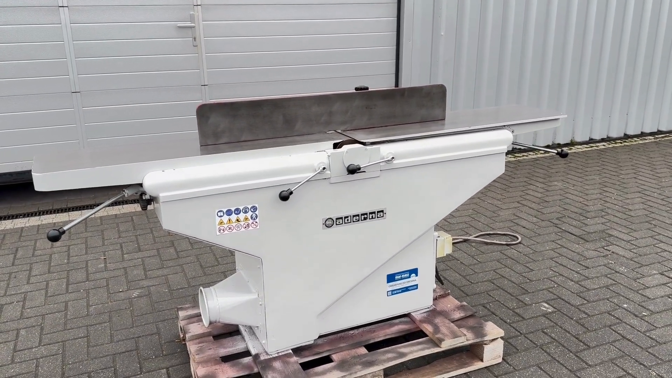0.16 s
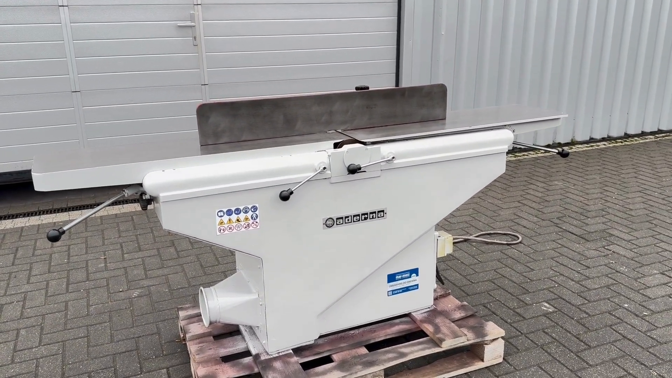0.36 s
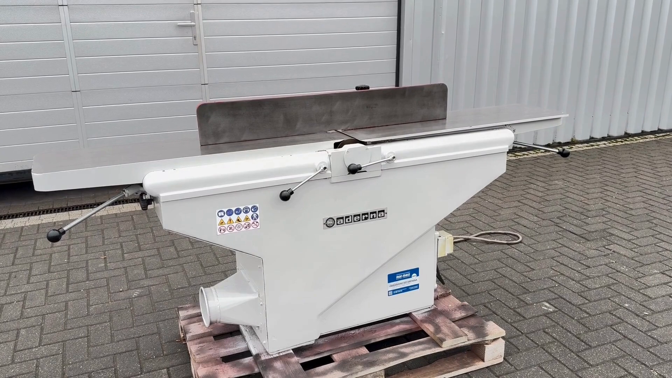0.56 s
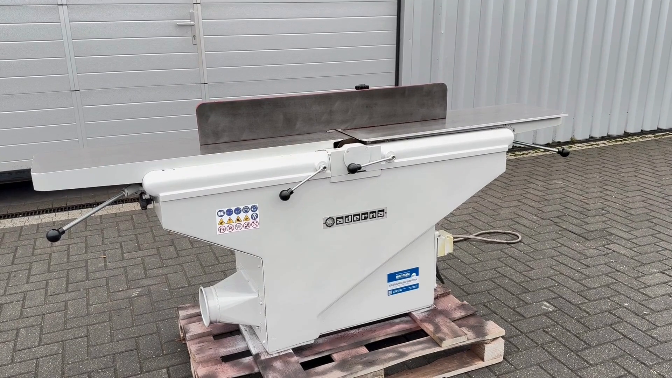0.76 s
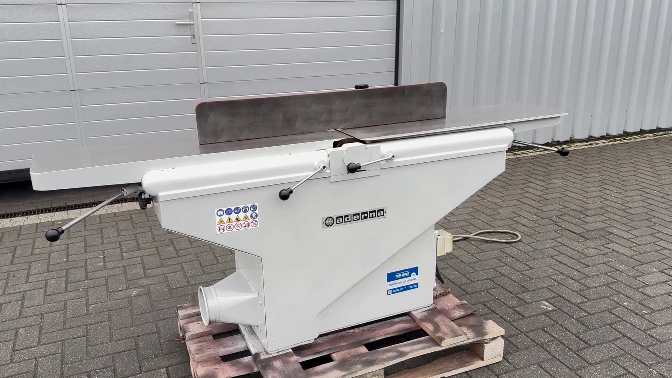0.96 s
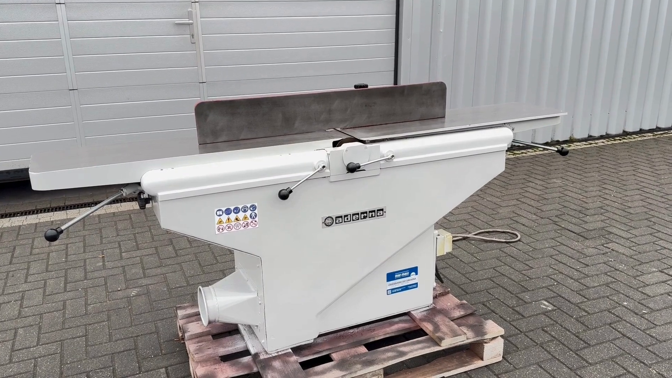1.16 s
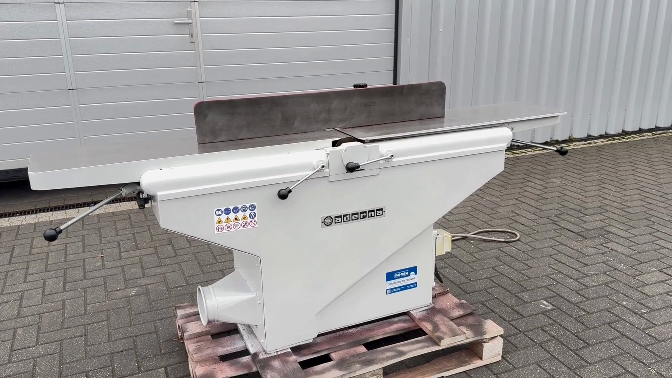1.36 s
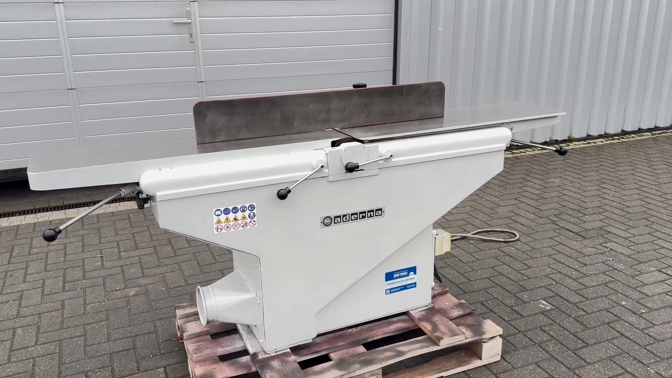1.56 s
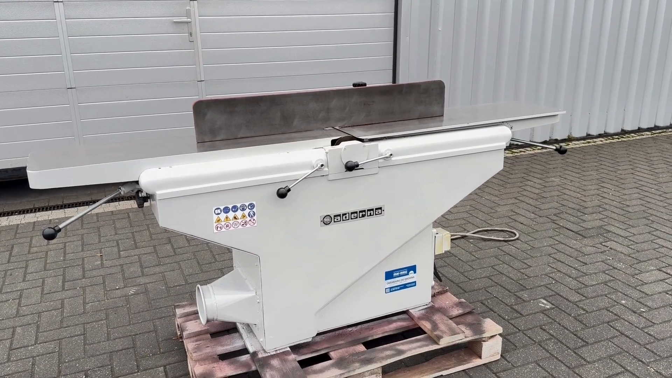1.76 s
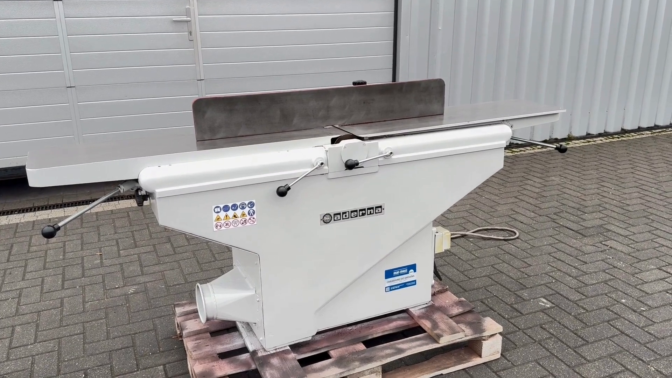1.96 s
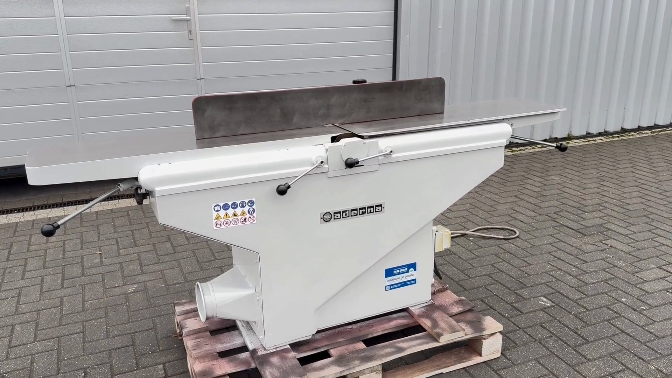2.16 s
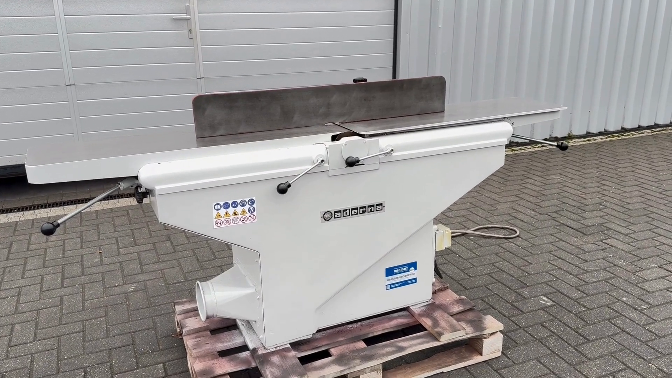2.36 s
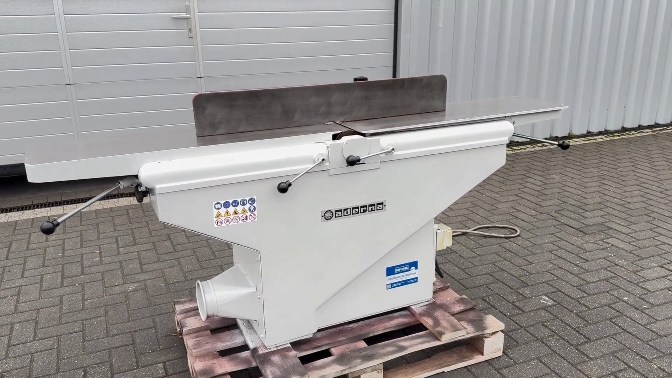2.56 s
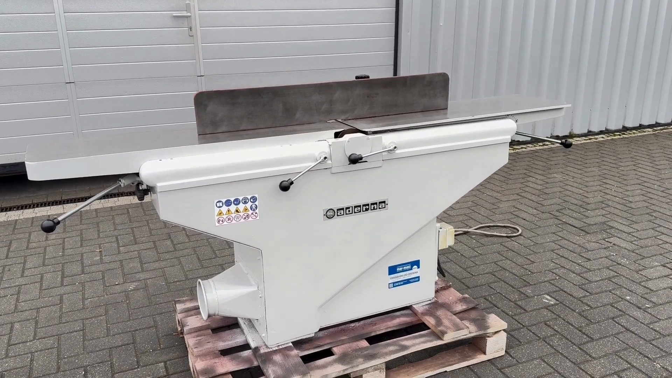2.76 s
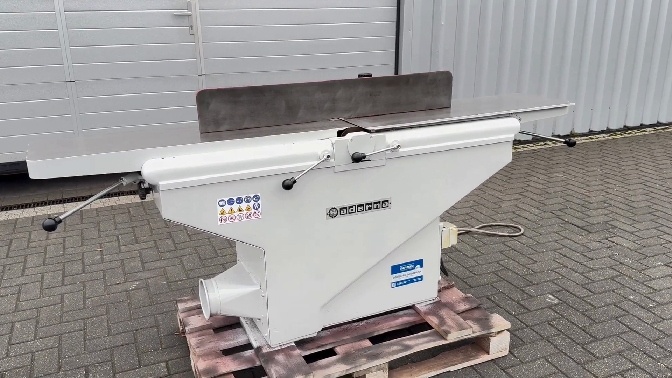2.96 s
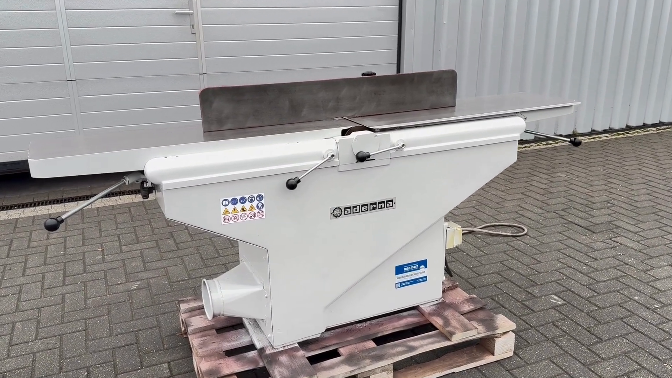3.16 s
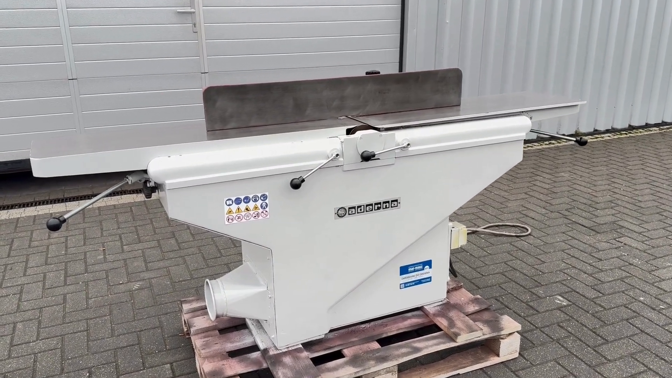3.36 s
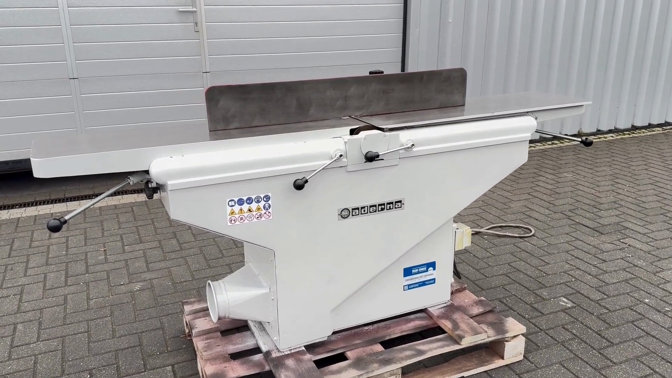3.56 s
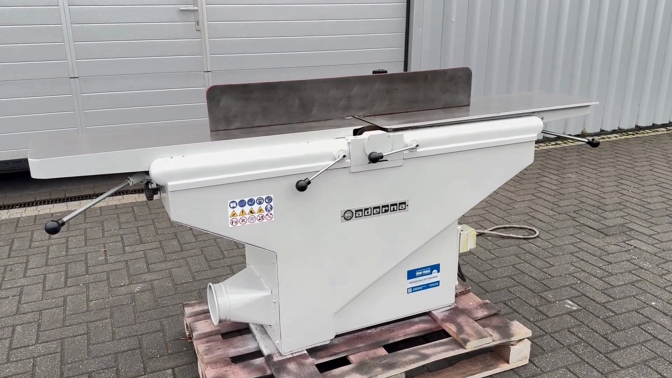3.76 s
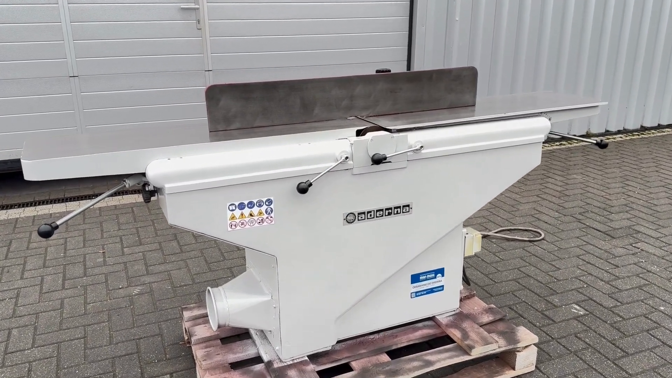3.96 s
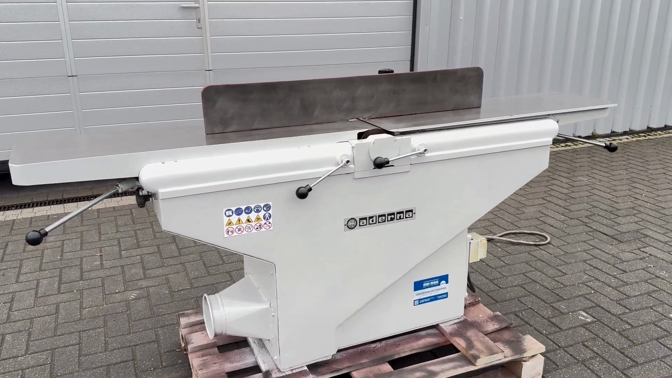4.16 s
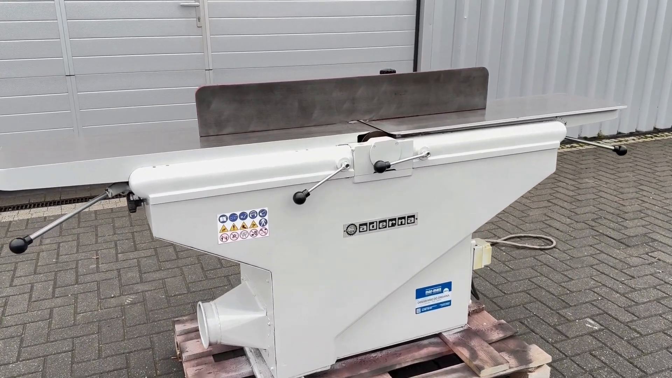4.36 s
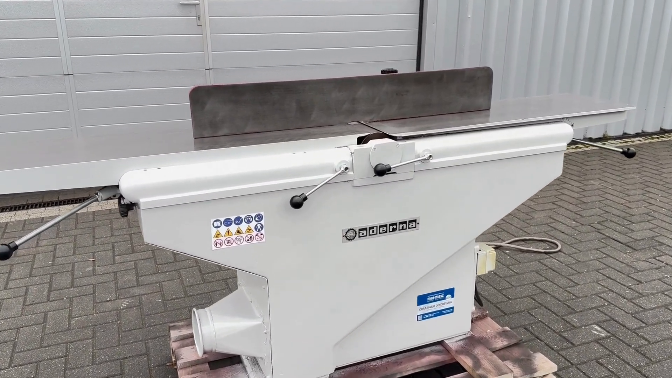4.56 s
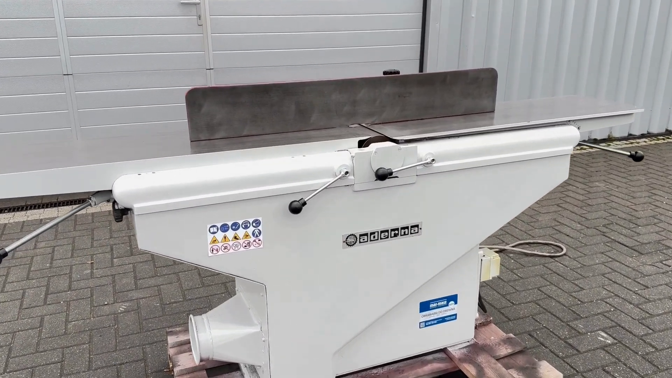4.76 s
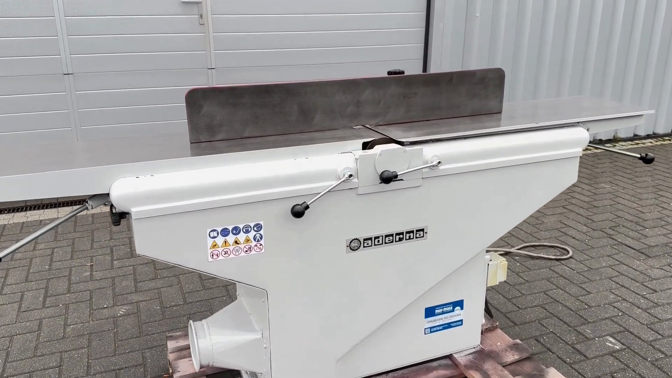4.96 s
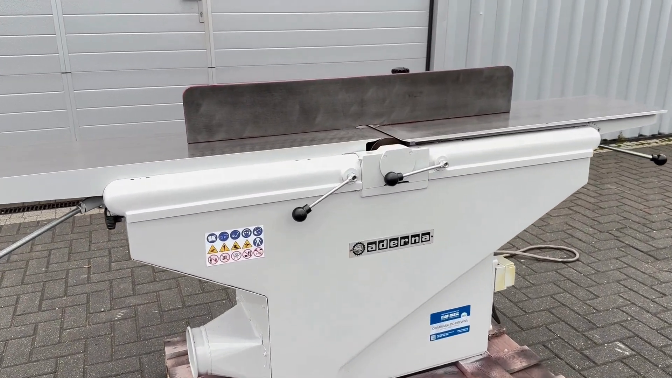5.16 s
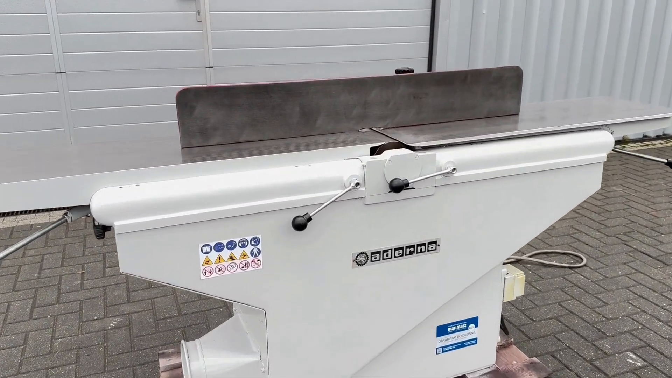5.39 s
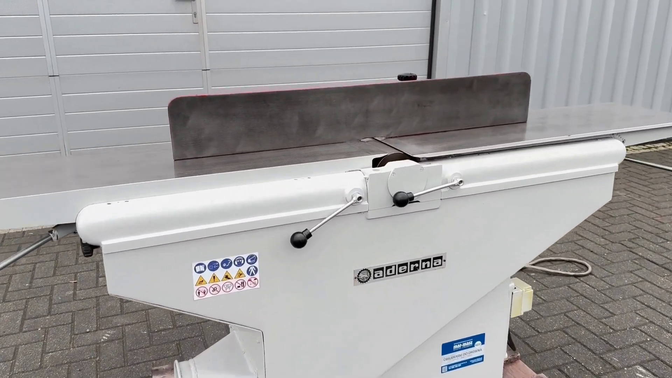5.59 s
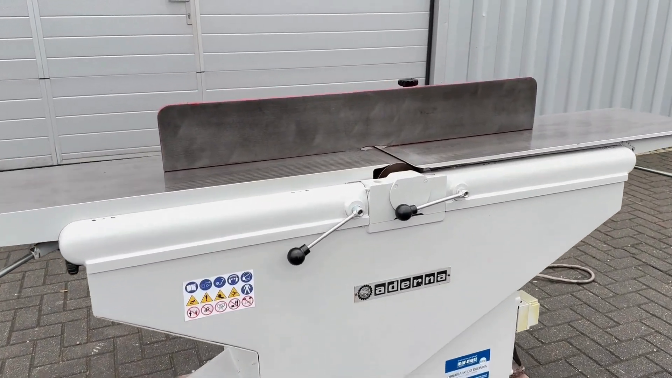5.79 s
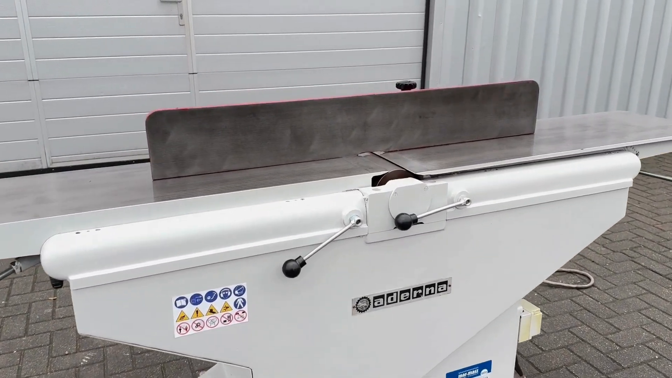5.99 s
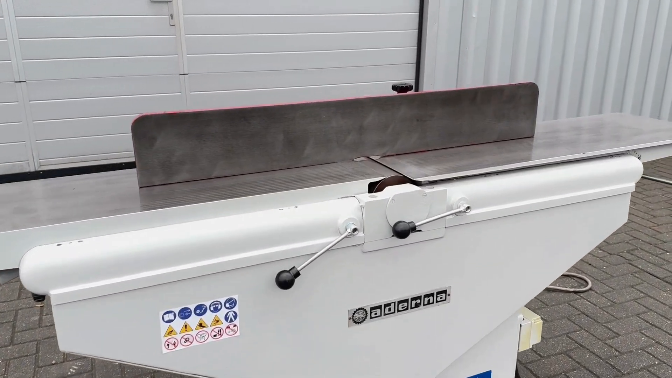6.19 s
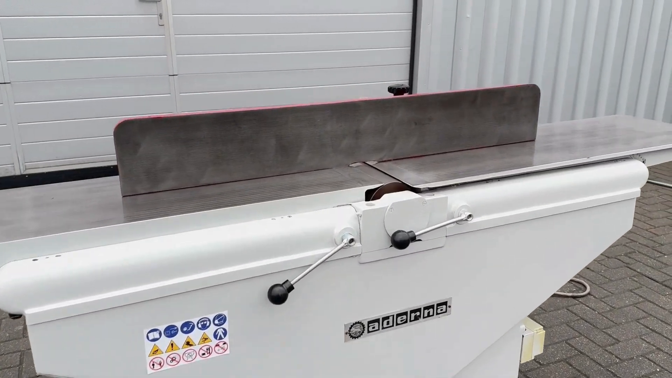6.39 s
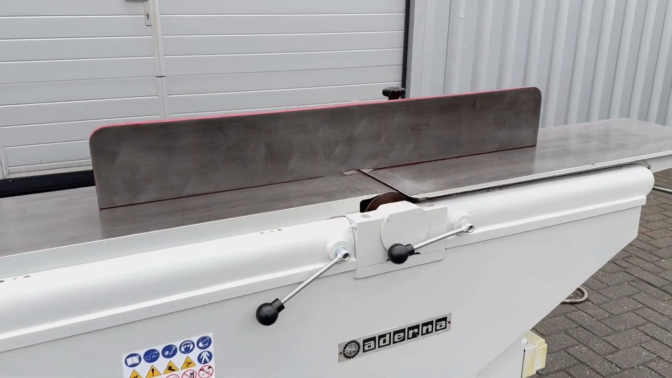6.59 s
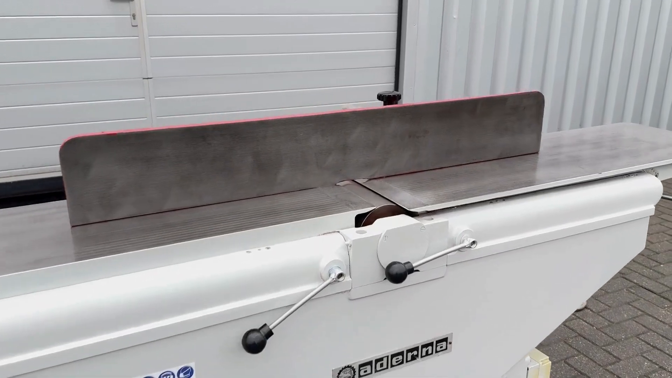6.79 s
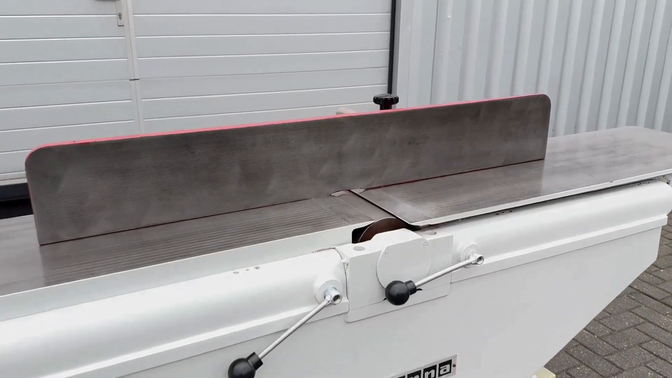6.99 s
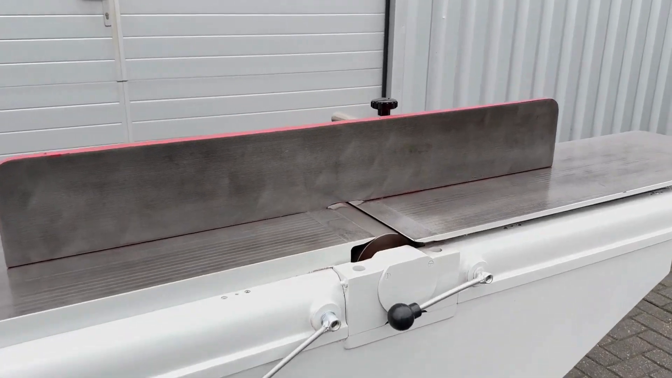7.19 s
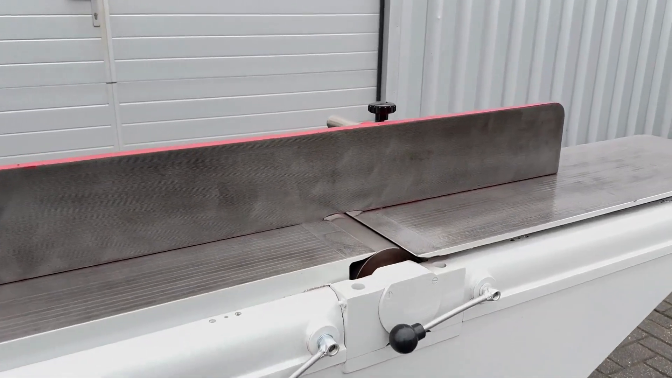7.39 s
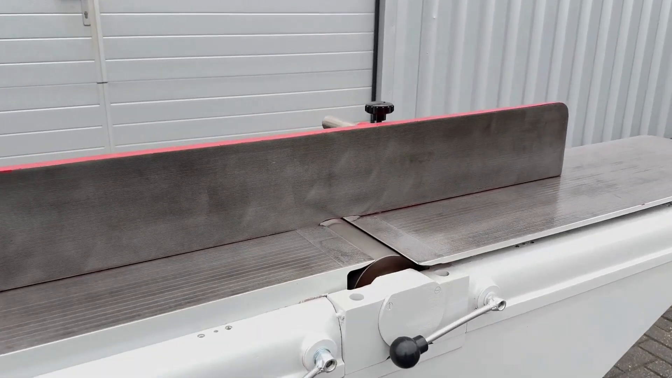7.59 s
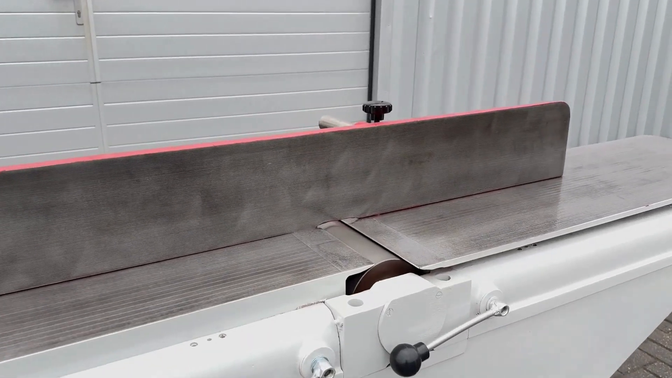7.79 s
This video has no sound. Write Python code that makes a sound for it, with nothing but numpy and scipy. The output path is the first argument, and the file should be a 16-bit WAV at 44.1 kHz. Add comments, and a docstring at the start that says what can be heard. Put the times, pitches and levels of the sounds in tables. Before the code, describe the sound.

A jointer planer is already running at full, constant speed in a paved yard, and it never starts, stops or cuts wood. Its three-knife block produces a siren-like steady tone near 240 Hz with strong harmonics up to about 1.7 kHz, over wavering motor and belt hum, rushing air and thin bright hiss. From 0 to 3 s the microphone stays back, the sound fairly even, with a tiny low wind bump around 0.4 s. From 3 to 6.5 s it walks closer: the fundamental and buzz swell clearly, while overtones fade, bloom and shift left or right through echoes from paving and wall. Faint high whistles recede. A very faint puff passes near 4.4 s. From 6.5 to 7.8 s the whine is close, full and loudest; soft wind bumps flutter from 7.4 s, the strongest low thump landing just before the end.

```python
"""Walking up to an idling jointer planer

A cast-iron jointer planer idles in a paved yard while the listener walks up to its table.
Three knives chop the air at the table lips like a siren: a stack of tones on one rotation phase.
Belt, motor and frame drone as wavering sines; the block drags air along as banded noise with echoes.
Siren tones swell and fade through loud and quiet spots before the wall; slot whistles recede.
Light wind puffs push the microphone as short low-frequency bursts."""
import sys
import numpy as np
from scipy import signal
from scipy.io import wavfile

SR = 44100
rng = np.random.default_rng(int(sys.argv[2]) if len(sys.argv) > 2 else 0)


def output_pcm(signal):
    """Save a mono or channel-first signal as 16-bit PCM at the path in sys.argv[1].

    Samples are clipped to [-1, 1] before scaling.
    """
    pcm = np.clip(np.atleast_2d(signal).T, -1, 1) * 32767
    wavfile.write(sys.argv[1], SR, np.round(pcm).astype(np.int16))


N = 345744


def from_db(db):
    """Decibels to amplitude gain."""
    return 10 ** (np.asarray(db) / 20)


def rms_one(x):
    """Scale to unit power."""
    return x / np.sqrt(np.mean(x ** 2) + 1e-20)


def seconds():
    """Time of each sample."""
    return np.arange(N) / SR


def in_time(rows):
    """Each column of a curve table, sample by sample."""
    time_s, *columns = np.transpose(rows)
    return [np.interp(seconds(), time_s, column) for column in columns]


def at_hz(points, hz):
    """Read a spectrum on a log-frequency axis."""
    table = np.array(points)
    return np.interp(np.log(hz), np.log(table[:, 0]), table[:, 1])


def any_phase():
    """Random starting angle in radians."""
    return rng.uniform(0, 2 * np.pi)


def bell(centre_s, sigma_s):
    """Gaussian rise to 1 at centre_s, and the fall after it."""
    return np.exp(-0.5 * ((seconds() - centre_s) / sigma_s) ** 2)


def drift(rate_hz):
    """Slow random curve of unit RMS: noise through two equal poles at rate_hz."""
    step = 40  # samples per slow point
    r = np.exp(-2 * np.pi * rate_hz * step / SR)
    settle = 2000
    white = rng.standard_normal(N // step + settle + 2)
    slow = signal.lfilter([1], [1, -2 * r, r * r], white)[settle:]
    return np.interp(np.arange(N) / step, np.arange(len(slow)), rms_one(slow))


def tone(phase, level_db, pan_db, lead_rad):
    """One sine at two ears: pan_db is left over right, lead_rad the left ear's phase lead."""
    lean = from_db(pan_db / 2)
    gain = np.sqrt(2) * from_db(level_db) * 2 / (lean + 1 / lean)
    left = lean * np.sin(phase + lead_rad / 2)
    right = np.sin(phase - lead_rad / 2) / lean
    return gain * np.array([left, right])


# wind puffs: (time [s], level [dB], Gaussian sigma [s])
WIND_PUFFS = [(.19, -44, .03), (0.378, -35, .02), (4.33, -43, .04), (4.44, -44, .03), (7.36, -40, .022),
              (7.426, -39, 0.02), (7.56, -39, .05), (7.69, -37, .025), (7.78, -24, .018)]
PUFF_HZ = 62.3


def wind(lumpiness_rad, upper_db):
    """Each puff shoves the microphone for a few uneven low cycles, with eddies an octave above."""
    swell = sum(from_db(db) * bell(time_s, sigma_s) for time_s, db, sigma_s in WIND_PUFFS)
    phase = 2 * np.pi * PUFF_HZ * seconds() + lumpiness_rad * drift(24)
    shove = tone(phase, 0, 1.5 * drift(8), 0.25 * drift(8))
    eddies = tone(2 * phase + drift(30), upper_db, 0, 0)
    return swell * (shove + eddies)


# motor and frame tones: (frequency [Hz], level afar [dB], level close up [dB])
DRIVE_TONES = [(49.5, -50.5, -47.5), (198, -51.5, -49), (215.5, -52.5, -52), (261.1, -61, -54),
               (275, -53.5, -48), (345.3, -50.5, -45), (364, -57, -56), (386.4, -42.5, -41.5),
               (492.5, -46, -36), (612, -46, -48.5), (648, -42, -50), (746, -62, -47), (785, -55, -46),
               (858, -52.5, -45), (1025, -56, -52)]


def drive(near, waver_db, slip_rad):
    """Motor and belt shake the frame; the flapping belt makes the tones waver."""
    out = 0
    for hz, far_db, near_db in DRIVE_TONES:
        level_db = far_db + near * (near_db - far_db) + waver_db * drift(0.8)
        phase = 2 * np.pi * hz * seconds() + any_phase() + slip_rad * drift(0.67)
        out = out + tone(phase, level_db, rng.normal(0, 1.4), rng.normal(0, 0.33))
    return out


# two low tones and a whine: (frequency [Hz], level afar [dB], level close up [dB])
BELT_TONES = [(115.5, -42.5, -38), (129.3, -39, -38.5), (843, -41, -36.5)]
# dips of one belt tone: (time [s], row of BELT_TONES [from 1], Gaussian sigma [s], loss [dB])
BELT_DIPS = [(.45, 1, .35, 13), (.45, 2, .25, 6), (3.438, 1, 0.3, 7), (3.5, 2, .2, 7), (4.35, 2, 0.11, 4),
             (4.45, 3, 0.48, 10.5), (4.7, 1, 0.2, 15), (5.85, 1, 0.16, 12), (6.0, 2, 0.15, 8),
             (6.95, 2, 0.18, 10), (7.45, 1, 0.19, 17)]


def belt(near, slip_rad, waver_db, flutter_s):
    """Two close low tones of the belt beat under a thin, fluttering whine; each fades at times."""
    out = 0
    for row, (hz, far_db, near_db) in enumerate(BELT_TONES, start=1):
        fade_db = sum(loss_db * bell(time_s, sigma_s)
                      for time_s, which, sigma_s, loss_db in BELT_DIPS if which == row)
        level_db = far_db + near * (near_db - far_db) - fade_db + waver_db * drift(1.4)
        fluttered_s = seconds() + flutter_s * drift(9.5)
        phase = 2 * np.pi * hz * fluttered_s + any_phase() + slip_rad * drift(2.5)
        out = out + tone(phase, level_db, 0.74 * drift(0.48), 0.11 * drift(0.7))
    return out


# air noise at the two ears: (frequency [Hz], left-right correlation [-1 to 1])
EAR_CORRELATION = [(50, 0.97), (300, 0.94), (800, 0.25), (1500, 1), (2500, 0.62), (4500, 0.3), (8000, 0.85),
                   (13000, 1)]


def noise_bands(low_hz, high_hz, count):
    """Adjacent stereo noise bands as (centre Hz, noise); the mid has unit power per kilohertz."""
    edges = np.geomspace(low_hz, high_hz, count + 1)
    white = rng.standard_normal((2, 2, N))  # neighbouring bands take different noise
    for k, band in enumerate(zip(edges, edges[1:])):
        band_pass = signal.butter(2, band, "band", fs=SR, output="sos")
        mid, side = signal.sosfilt(band_pass, white[k % 2])
        hz = np.sqrt(band[0] * band[1])
        alike = np.clip(at_hz(EAR_CORRELATION, hz), 0, 1)
        side_gain = np.sqrt((1 - alike) / (1 + alike))
        yield hz, np.sqrt(SR / 2000) * (mid + side_gain * side * [[1], [-1]])


# rush spectra, afar and close up: (frequency [Hz], relative density [dB])
RUSH_SPECTRUM_FAR = [(30, 5), (45, -7), (110, 7), (170, -4), (220, 6), (330, 0.5), (460, 0), (600, -2.5),
                     (830, 1.5), (950, -10.5), (1250, -0.5), (1800, -1.5), (2300, -2), (3300, -9.5)]
RUSH_SPECTRUM_NEAR = [(30, -2), (45, 0), (110, 3.5), (170, 3.5), (220, -7), (330, 4.5), (460, -1.5),
                      (620, 2), (820, -5), (970, -0.5), (1250, -3.5), (1800, 1.5), (2450, -2),
                      (3300, -12.5)]


def rush(knife_phase, near, level_db, chop, chop_hz):
    """Turbulence in the slot, its part above chop_hz chopped as each knife passes the two lips."""
    pulse = 1 + chop * (np.cos(knife_phase) + np.cos(2 * knife_phase))
    out = 0
    for hz, noise in noise_bands(30, 3300, count=34):
        far_db, near_db = at_hz(RUSH_SPECTRUM_FAR, hz), at_hz(RUSH_SPECTRUM_NEAR, hz)
        colour_db = (1 - near) * far_db + near * near_db
        out = out + noise * from_db(colour_db) * (pulse if hz > chop_hz else 1)
    return from_db(level_db) * out


# hiss spectra, afar and close up: (frequency [Hz], relative density [dB])
HISS_SPECTRUM_FAR = [(3300, -0.5), (4300, 2.5), (5000, 0.5), (5500, 0.5), (5950, 0), (7300, -1.5),
                     (7700, -2.5), (8200, 4.5), (8700, -3), (9600, 3), (10900, -4.5), (12450, 3.5),
                     (14000, -1.5), (15700, -14)]
HISS_SPECTRUM_NEAR = [(3300, -3), (4200, 3.5), (5000, -2.5), (5600, 2.5), (5950, -6), (7300, -2.5),
                      (7700, 0), (8200, 1), (8700, -2.5), (9750, 3.5), (10900, -5.5), (12450, 3),
                      (14000, -3), (15700, -14)]


def hiss(knife_phase, near, level_db, chop, unsteady_db, patchy_db):
    """A bright, breathy hiss off the knife edges, slightly uneven in level and slowly shifting in colour."""
    out = 0
    for hz, noise in noise_bands(3300, 16000, count=24):
        far_db, near_db = at_hz(HISS_SPECTRUM_FAR, hz), at_hz(HISS_SPECTRUM_NEAR, hz)
        colour_db = (1 - near) * far_db + near * near_db
        uneven_db = unsteady_db * drift(25) + patchy_db * drift(0.81)
        out = out + noise * from_db(colour_db + uneven_db)
    return from_db(level_db) * out * (1 + chop * np.cos(2 * knife_phase))


# echoes off paving, door and wall: (delay afar [s], delay close up [s], level [dB])
YARD_ECHOES = [(.0031, .0047, -12), (.0068, .0079, -12), (.0125, .0135, -13)]


def yard(x, near):
    """Echoes comb the noise; the teeth slide with the walk, slightly apart at the two ears."""
    n, out = np.arange(N), x.copy()
    for far_s, near_s, level_db in YARD_ECHOES:
        for ear in range(2):
            delay = (far_s + near * (near_s - far_s) + ear * 4e-5) * SR  # samples
            out[ear] += from_db(level_db) * np.interp(n - delay, n, x[ear])
    return out


# breathy whistles at the table lips: (frequency [Hz], bandwidth [Hz], level afar [dB])
SLOT_WHISTLES = [(5550, 59, -53.5), (7400, 49, -65), (12100, 120, -57)]


def whistles(near, off_beam_db):
    """Narrow slot resonances blown by the air; they fade as the listener leaves their beam."""
    out = 0
    for hz, width_hz, level_db in SLOT_WHISTLES:
        r = np.exp(-np.pi * width_hz / SR)
        poles = [1, -2 * r * np.cos(2 * np.pi * hz / SR), r * r]
        blown = signal.lfilter([1, 0, -1], poles, rng.standard_normal((3, N)))
        stereo = blown[0] + 0.5 * blown[1:]  # shared part plus one part per ear
        out = out + from_db(level_db) * rms_one(stereo)
    return out * from_db(off_beam_db * near)


# unequal knives and imbalance: (multiple of block turning rate, level at half nearness [dB])
IMBALANCE_LINES = [(1, -45.5), (2, -56.5), (4, -46.5), (5, -57), (7, -50), (8, -46.5), (10, -52), (11, -56),
                   (13, -59), (14, -62), (16, -58.5), (17, -63), (19, -70), (20, -62), (22, -60)]


def imbalance(turn_phase, near, approach_db, waver_db):
    """No two knives are alike, so faint lines stand at multiples of the turning rate."""
    out = 0
    for order, base_db in IMBALANCE_LINES:
        level_db = base_db + approach_db * (near - 0.5) + waver_db * drift(1.5)
        out = out + tone(order * turn_phase + any_phase(), level_db, 0, 0)
    return out


# weak siren tones: (multiple of knife rate, level afar [dB], level close up [dB])
WEAK_SIREN = [(8, -52.5, -38.5), (9, -44, -48.5), (10, -56.5, -41), (11, -69, -47), (12, -66, -45),
              (13, -47, -51.5), (14, -65.5, -55), (16, -65, -52.5), (17, -61, -67), (19, -58, -55),
              (20, -60, -53), (21, -54, -56), (22, -68, -67), (23, -53, -56.5)]


def overtones(knife_phase, near, fading_db, flutter_db, spread_rad):
    """Short waves flutter, and fade in and out as the listener moves through wall and ground echoes."""
    out = 0
    for order, far_db, near_db in WEAK_SIREN:
        fading = fading_db * (0.5 + near) * drift(2.2)
        level_db = far_db + near * (near_db - far_db) + fading + flutter_db * drift(22)
        phase = order * knife_phase + any_phase() + 0.27 * drift(16)
        out = out + tone(phase, level_db, 2.0 * drift(0.68), spread_rad * drift(0.56))
    return out


# strong siren tones: (multiple of knife rate, left afar [dB], right afar [dB],
# left close up [dB], right close up [dB], phase lead at left ear [rad])
STRONG_SIREN = [(1, -27.8, -31.2, -19.7, -16.8, 0.1), (2, -28.3, -27.8, -21.7, -24.0, 0.3),
                (3, -47.7, -37.8, -26.7, -28.2, -0.1), (4, -37.7, -34.9, -36.3, -38.8, 0.5),
                (5, -33.6, -31.8, -26.6, -26.4, 0.2), (6, -32.8, -32.3, -35.2, -34.6, 0.9),
                (7, -28.9, -33.6, -24.7, -22.4, -0.3)]
# spots where an echo lifts or weakens one tone: (time [s], multiple of knife rate,
# Gaussian sigma [s], left gain [dB], right gain [dB], extra phase lead at left ear [rad])
ECHO_SPOTS = [(0.8, 5, 1.09, -2.5, -20.5, 0.8), (1.14, 1, 1.49, -3.0, -8.0, 0.4),
              (1.23, 7, 1.07, -4.0, -24.5, -0.4), (1.74, 4, 1.81, -7.5, -9.0, 3.1),
              (3.4, 2, 0.43, 4.0, 0.5, 0.2), (3.69, 5, 0.5, -6.0, -9.5, 0.2),
              (3.77, 3, 0.36, -11.5, -7.0, 0.8), (4.43, 6, 0.14, -7.0, -4.0, 0.5),
              (4.58, 7, 0.18, -8.5, -11.0, -0.5), (4.76, 1, 0.49, -2.5, 3.0, 0.4),
              (5.06, 2, 0.29, 2.5, -7.5, 0.4), (5.4, 2, 0.3, 1.0, 4.0, -0.2),
              (5.41, 6, 0.22, 5.5, -12.0, 0.9), (5.58, 7, 0.64, -6.5, -16.0, -2.3),
              (5.94, 3, 0.73, 3.0, 3.5, 0.4), (6.08, 6, 0.08, -5.5, -4.5, -0.3),
              (6.61, 5, 0.22, 6.0, -14.0, 0.8), (6.96, 6, 0.74, 9.5, 7.0, -0.6),
              (6.98, 5, 0.36, -7.5, -2.0, 2.4), (7.0, 7, 0.52, -12.0, -18.5, -0.9),
              (7.61, 2, 0.41, -7.0, -12.0, 0.7)]


def siren(knife_phase, near, dispersion_rad, wander_rad, sway_db):
    """Each knife squeezes air past the lip: clean tones follow the walk and its loud and quiet spots."""
    out = 0
    for order, left_far_db, right_far_db, left_near_db, right_near_db, lead_rad in STRONG_SIREN:
        left_db = left_far_db + near * (left_near_db - left_far_db + sway_db * drift(1.3))
        right_db = right_far_db + near * (right_near_db - right_far_db + sway_db * drift(1.5))
        for time_s, multiple, sigma_s, left_gain_db, right_gain_db, turn_rad in ECHO_SPOTS:
            if multiple == order:
                inside = bell(time_s, sigma_s)
                left_db = left_db + left_gain_db * inside
                right_db = right_db + right_gain_db * inside
                lead_rad = lead_rad + turn_rad * inside
        phase = order * knife_phase + dispersion_rad * order ** 2 + wander_rad * drift(0.74)
        ears = from_db([left_db, right_db]) * np.sin([phase + lead_rad / 2, phase - lead_rad / 2])
        out = out - np.sqrt(2) * from_db(0.18 * drift(13)) * ears
    return out


# walk up to the machine: (time [s], nearness [0 afar to 1 at the table])
WALK = [(0, 0), (3, 0.1), (4.3, 0.45), (5.5, 0.68), (6.5, 0.9), (7.84, 1)]
KNIVES, KNIFE_HZ = 3, 239.4
# level afar, and gain on reaching the table
RUSH_DB, RUSH_GAIN_DB = -40, 3.5
HISS_DB, HISS_GAIN_DB = -51.5, 5.5
AIR_GROWTH = 0.34  # exponent on nearness: most of the air's dB gain comes with the first steps


def scene():
    """Everything on the cutter block follows one rotation; the machine's levels follow the walk."""
    near, = in_time(WALK)
    knife_phase = 2 * np.pi * np.cumsum(KNIFE_HZ + 0.0969 * drift(0.696)) / SR

    whine = siren(knife_phase, near, dispersion_rad=1.15, wander_rad=0.36, sway_db=0.4)
    whine = whine + overtones(knife_phase, near, fading_db=0.8, flutter_db=1.94, spread_rad=0.88)

    hum = imbalance(knife_phase / KNIVES, near, approach_db=1.5, waver_db=0.6)
    hum = hum + drive(near, waver_db=2.0, slip_rad=0.18)
    hum = hum + belt(near, slip_rad=0.22, waver_db=0.8, flutter_s=7e-5)

    exposed = np.clip(near, 0, 1) ** AIR_GROWTH
    rush_db = RUSH_DB + RUSH_GAIN_DB * exposed
    hiss_db = HISS_DB + HISS_GAIN_DB * exposed
    air = rush(knife_phase, near, rush_db, chop=0.21, chop_hz=1200)
    air = air + hiss(knife_phase, near, hiss_db, chop=0.04, unsteady_db=1.86, patchy_db=0.5)

    machine = whine + hum + yard(air, near) + whistles(near, off_beam_db=-10)
    return machine + wind(lumpiness_rad=0.8, upper_db=-5.5)


LOW_CUT_HZ, CUTOFF_HZ = 32, 15750


def record(dry):
    """The microphone thins the deepest bass; the top is cut steeply."""
    high_pass = signal.butter(4, LOW_CUT_HZ, "high", fs=SR, output="sos")
    low_pass = signal.ellip(10, 0.1, 90, CUTOFF_HZ, fs=SR, output="sos")
    return signal.sosfilt(low_pass, signal.sosfilt(high_pass, dry))


dry = scene()
out = record(dry)
output_pcm(out)
```